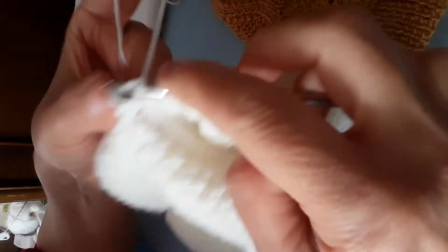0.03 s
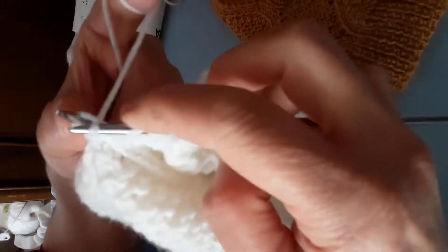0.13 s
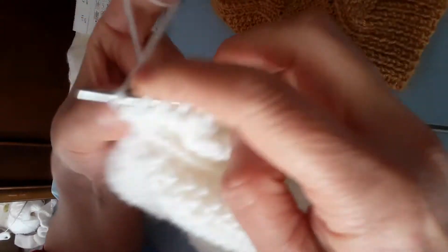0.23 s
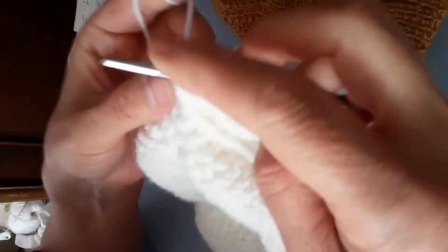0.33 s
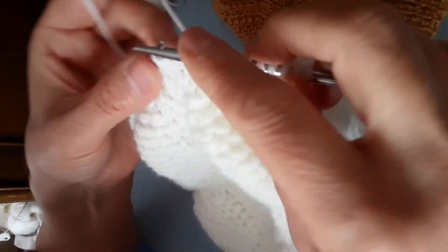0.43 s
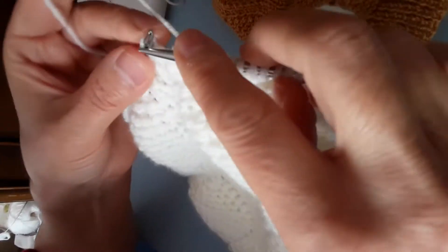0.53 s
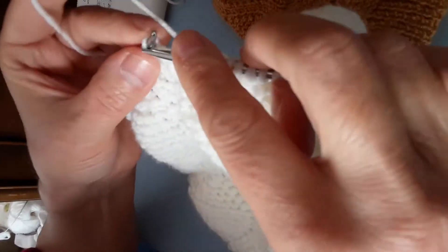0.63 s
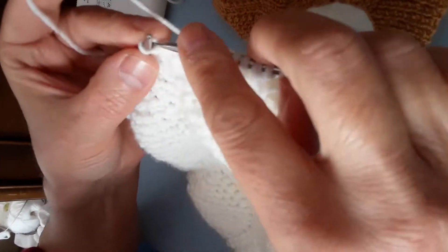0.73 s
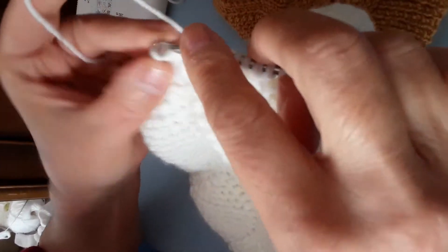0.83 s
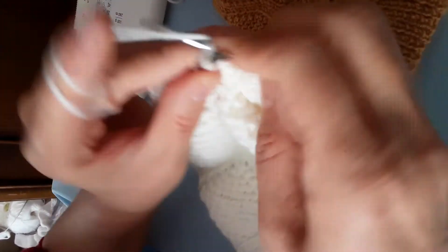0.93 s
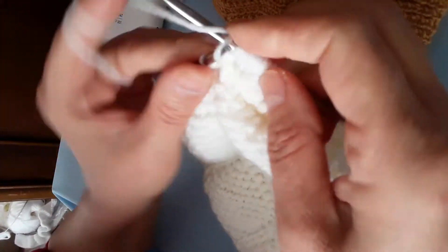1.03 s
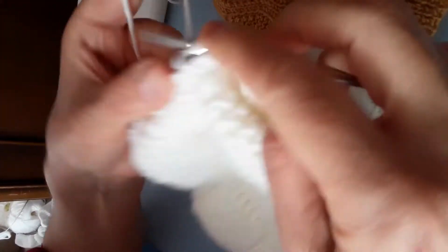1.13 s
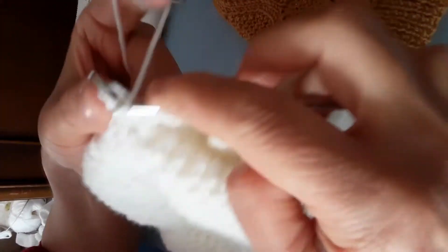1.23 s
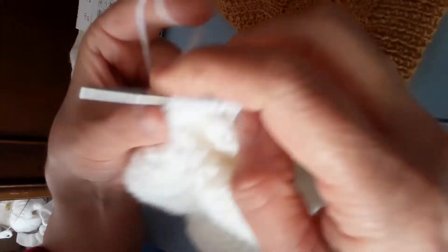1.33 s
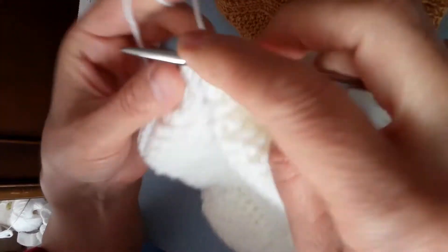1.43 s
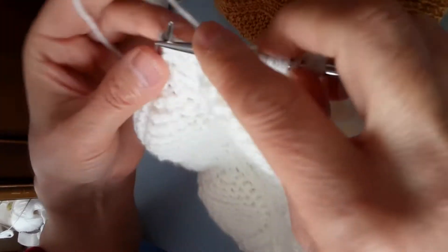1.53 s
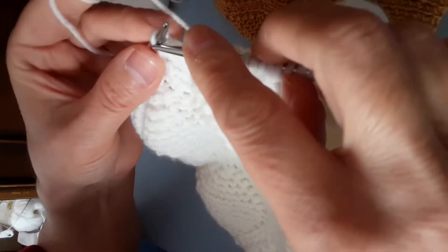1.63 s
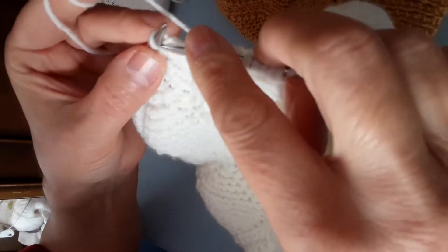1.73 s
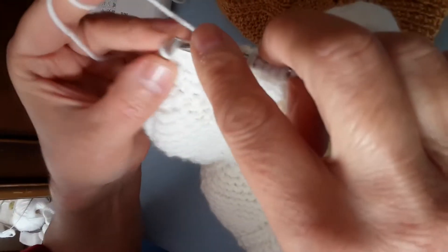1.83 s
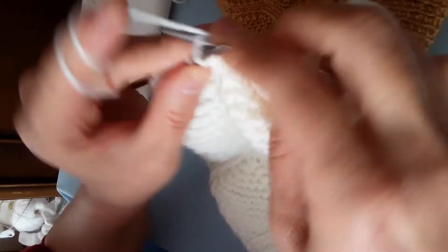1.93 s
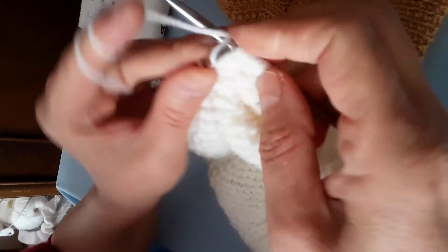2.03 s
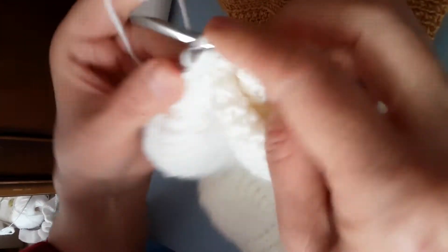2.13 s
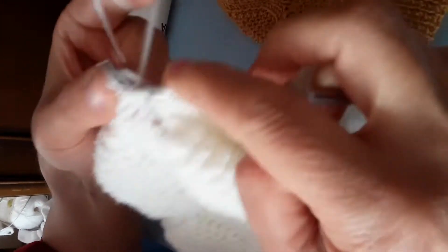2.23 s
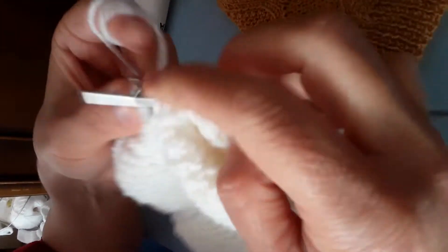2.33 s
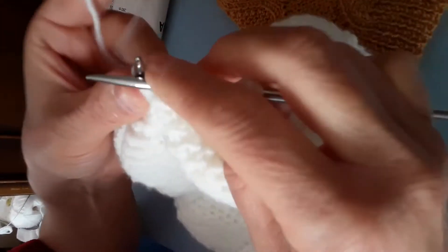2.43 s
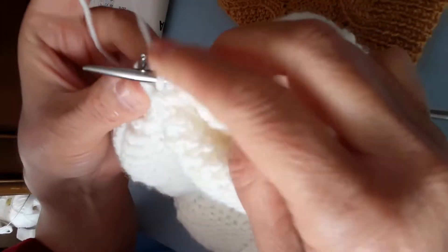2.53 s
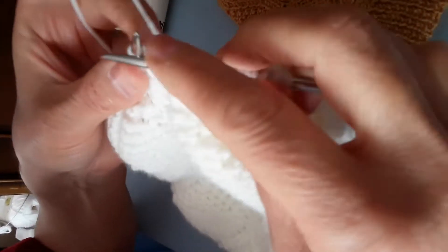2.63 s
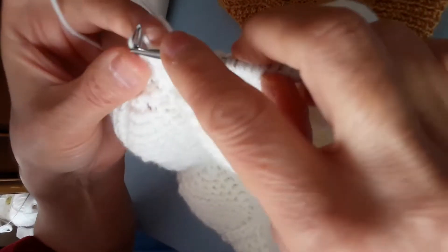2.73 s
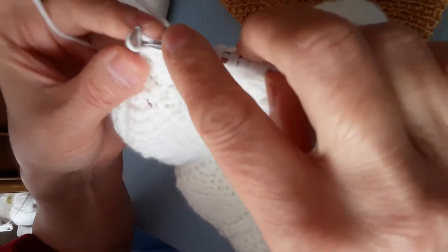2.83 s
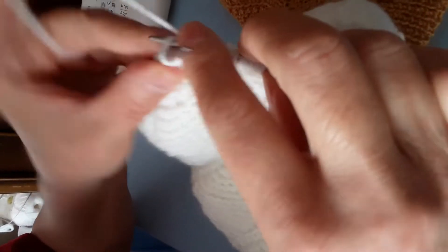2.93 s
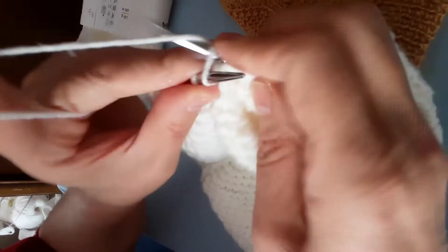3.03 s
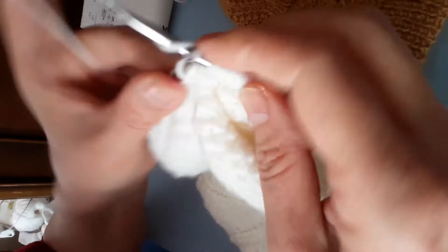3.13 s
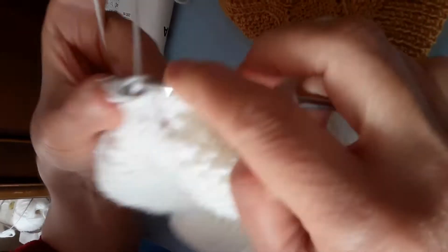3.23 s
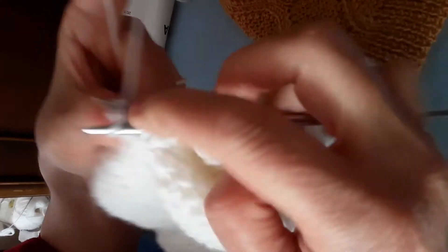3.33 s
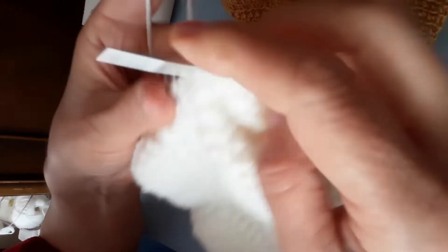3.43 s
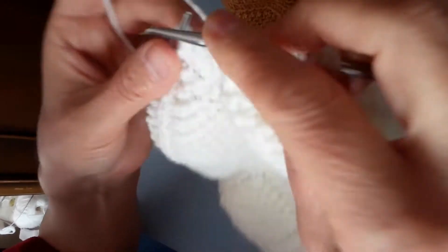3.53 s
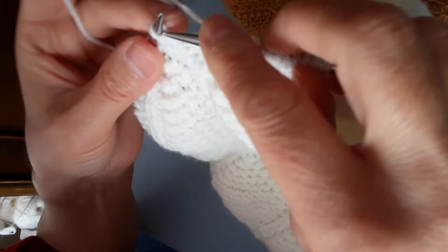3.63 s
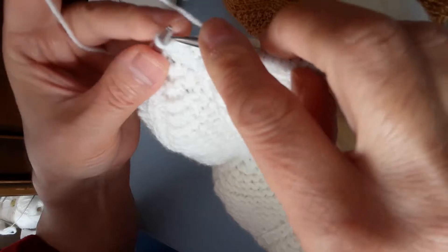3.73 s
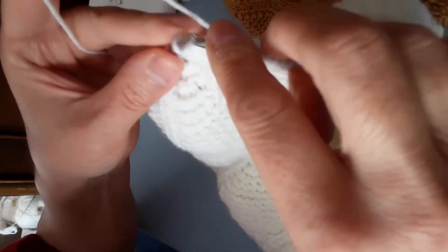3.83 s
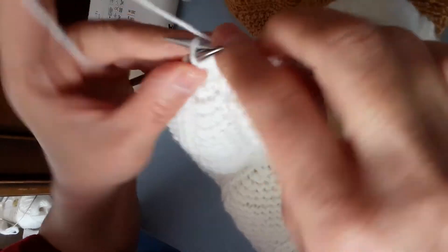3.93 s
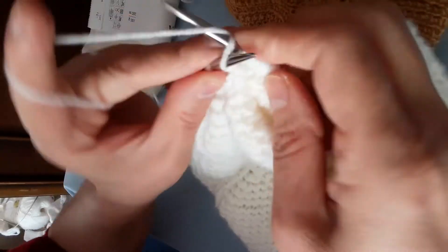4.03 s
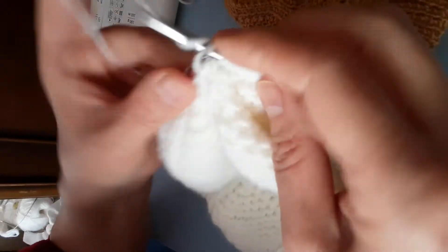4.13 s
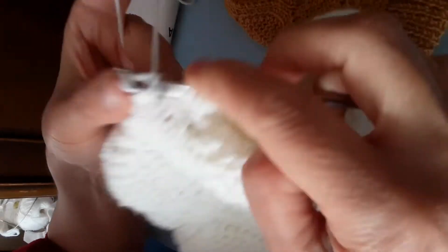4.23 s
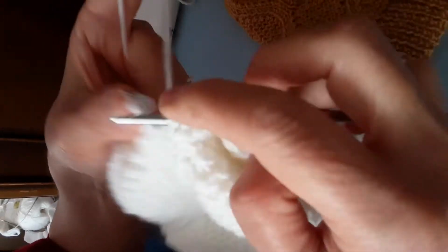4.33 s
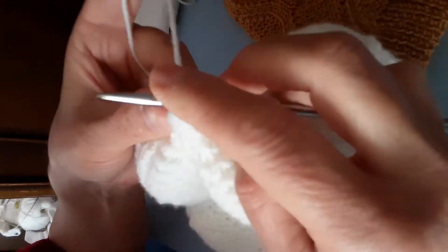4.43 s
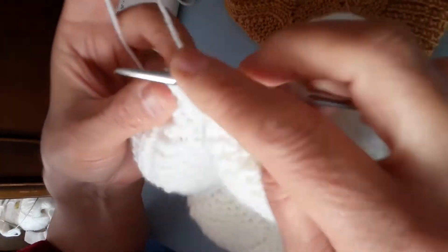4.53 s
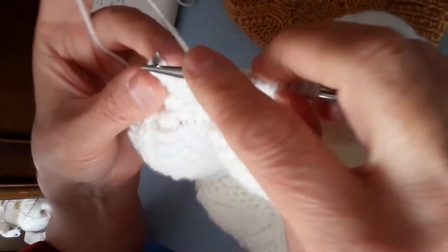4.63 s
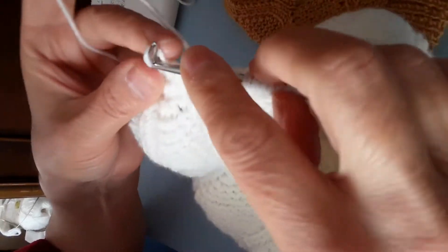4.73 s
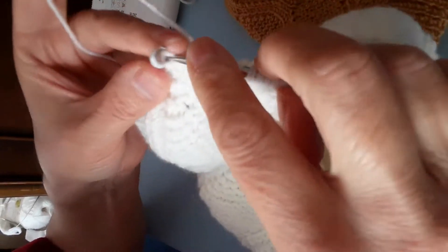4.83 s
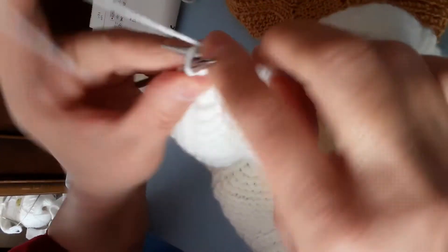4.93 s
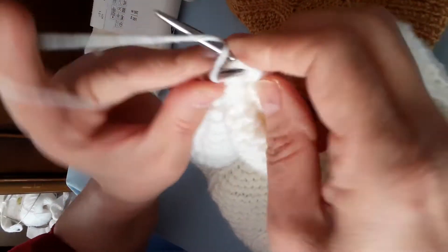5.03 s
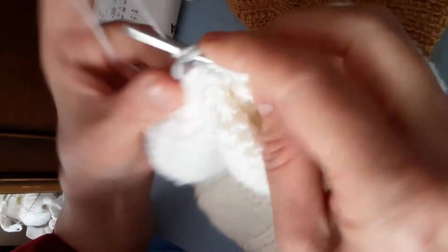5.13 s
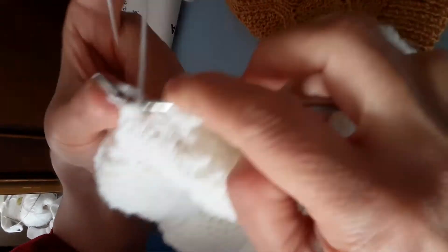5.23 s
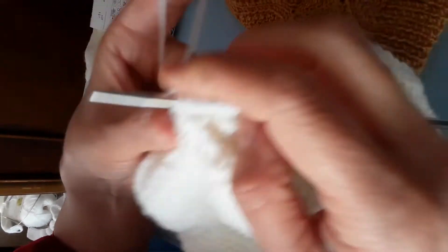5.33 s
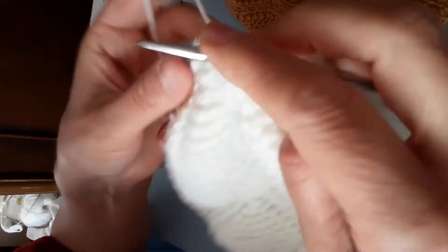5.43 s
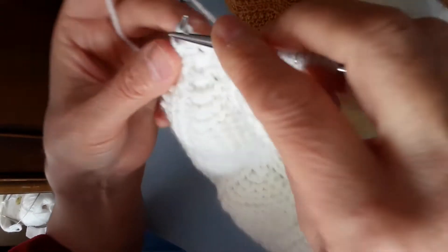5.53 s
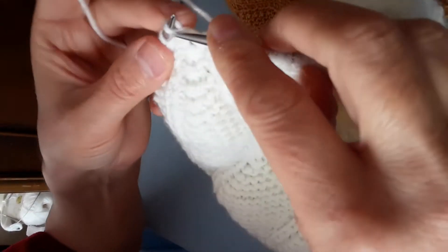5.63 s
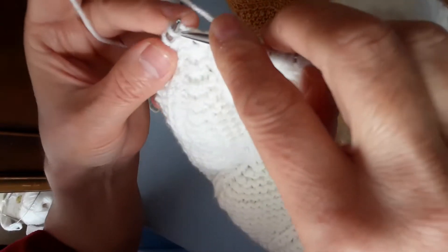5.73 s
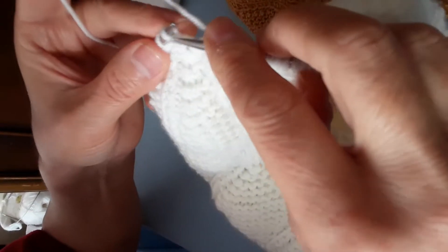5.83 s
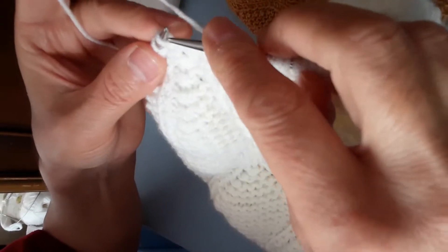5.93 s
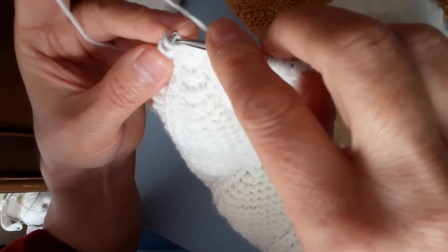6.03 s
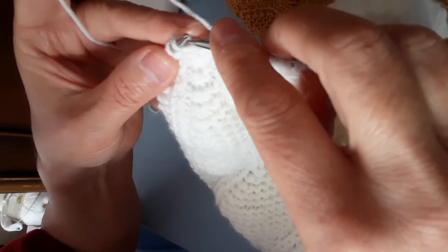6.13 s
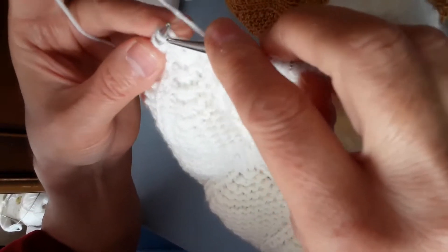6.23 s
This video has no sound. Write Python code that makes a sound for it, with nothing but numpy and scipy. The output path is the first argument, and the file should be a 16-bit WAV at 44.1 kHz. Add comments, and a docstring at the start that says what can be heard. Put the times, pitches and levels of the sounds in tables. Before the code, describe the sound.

Close, crisp clicks of thin metal needles in irregular clusters, soft yarn swishes about once a second, and a single woody knock over faint hum.

```python
"""Metal knitting needles tick and scrape close by; yarn rustles with each stitch in a quiet room.
Under it lie a low hum, thin hiss, one hollow knock further off, fainter knocks, dry taps and soft bumps.
Ticks are short blows filtered by a held needle; slides are gritty noise through the same needle.
Yarn is coloured noise with fibre snaps, shaped by five strokes and a cloth movement per stitch.
Knocks are decaying wood modes plus a thud; bumps are rough low tones; creaks are narrow noise bursts."""
import sys
import numpy as np
from scipy import signal
from scipy.fft import rfft, irfft
from scipy.io import wavfile
from scipy.ndimage import uniform_filter1d

SR = 44100
rng = np.random.default_rng(int(sys.argv[2]) if len(sys.argv) > 2 else 0)


def store_wav(level_fs):
    """Save 16-bit WAV to argv[1]."""
    pcm = np.round(np.clip(np.atleast_2d(level_fs), -1, 1) * 32767)
    wavfile.write(sys.argv[1], SR, pcm.T.astype(np.int16))


N = 277830

# Rumble spectrum. Each row: frequency in Hz, relative level in dB.
HUM_SPECTRUM = [(22, -53), (34, -12), (45, -8.5), (60, 1), (85, 1), (113, -6), (152, 0), (200, -7),
                (300, -8), (420, -19), (700, -21), (1020, -21), (1400, -36), (3300, -85)]
HUM_START_DB, HUM_SINK_DB_PER_S = -61.5, 0.34
# Hiss of the still room. Each row: frequency in Hz, relative level in dB per Hz.
AIR_SPECTRUM = [(710, -30), (1200, -3), (1470, -5), (1910, -3.5), (2080, -5.5), (3380, -8.5), (3810, -9),
                (4520, -9), (5320, -12.5), (5610, -11), (7430, -8.5), (8540, -24), (14800, 3.5),
                (15800, -1)]
AIR_DB = -72.5
# Hiss of opposite sign in the two channels. Each row: frequency in Hz, relative level in dB per Hz.
SIDE_HISS_SPECTRUM = [(24, -38), (40, -29), (91, -1), (261, -7), (1360, -17.5), (3110, -27), (5000, -20),
                      (8670, -37), (11400, -14.5), (15800, -11.5)]
SIDE_HISS_DB = -76
# Decay of the room. Each row: frequency in Hz, t60 in seconds.
ROOM_DECAY = [(200, 0.29), (1000, 0.44), (6000, 0.36), (15000, 0.37)]
# Upper limit of coloured noise and slides; edge of the final low-pass.
TOP_HZ, EDGE_HZ = 15950, 16900

# Soft low bumps. Each row: start in seconds, rms level in dB, frequency in Hz, length in seconds.
BUMPS = [(0.121, -63.5, 87.3, 0.25), (0.48, -66.5, 181, 0.054), (0.611, -56, 75.3, 0.074),
         (0.935, -59, 338, 0.099), (1.45, -71.5, 330.3, 0.22), (2.698, -64, 327, 0.12),
         (3.68, -62.5, 157, 0.19), (3.983, -70, 286.3, 0.21), (4.42, -67, 163.3, 0.39),
         (4.427, -69.5, 278, 0.35), (5.7, -67, 152.8, 0.25)]
# Light dry taps. Each row: start in seconds, initial level in dB, t60 in seconds.
TAPS = [(0.953, -65.5, 0.2), (2.285, -61, 0.015), (2.7, -68, 0.084), (4.2982, -55, 0.016)]
# Colour of the taps. Each row: frequency in Hz, relative level in dB per Hz.
TAP_SPECTRUM = [(300, 3), (900, 4.5), (1900, 5), (2400, -11.5), (3300, -11), (5000, -40)]
# Knocks on wooden furniture. Each row: start in seconds, relative level in dB, dullness in dB per octave.
KNOCKS = [(0.95, -26, 7), (2.039, 1.5, 1), (2.701, -26.5, 9), (4.299, -28, -2)]
# Ring of the furniture. Each row: frequency in Hz, relative level in dB, t60 in seconds.
WOOD_MODES = [(210, -9.5, 0.064), (245, -2, 0.064), (318, -13, 0.32), (385, -16, 0.24), (462, -13.5, 0.17),
              (548.5, -9, 0.18), (653, -22, 0.28), (745, -16, 0.24), (829, -8.5, 0.21), (874, -5.5, 0.13),
              (918, -13, 0.26), (1108, -11.5, 0.19), (1142, -16, 0.18), (1250, -22, .19), (1406, -18, 0.15),
              (1700, -28, 0.2), (2260, -39, 0.13), (3080, -31, .17)]
# Dull body of a blow. Each row: frequency in Hz, relative level in dB per Hz.
THUD_SPECTRUM = [(80, -15), (220, 7.5), (900, -3), (1400, -5.5), (1900, -21), (3200, -22.5), (6000, -22)]

# Taut yarn creaking along a needle.
# Each row: start in seconds, rms level in dB, centre in Hz, width in Hz, length in seconds.
CREAKS = [(0.148, -61, 12200, 2000, .012), (0.153, -51.5, 6480, 810, 0.01), (0.758, -62, 7600, 900, 0.013),
          (0.888, -61.5, 10200, 2800, 0.018), (0.905, -59, 7460, 550, 0.028),
          (0.953, -63, 6400, 1000, 0.024), (1.777, -63, 7400, 1810, 0.025), (2.467, -62, 5380, 300, 0.015),
          (4.907, -67.5, 7600, 700, 0.026)]
# Wool rubbing. Each row: frequency in Hz, relative level in dB per Hz.
WOOL_SPECTRUM = [(2240, -18), (3800, -14.5), (4490, -9), (4940, -4.5), (7110, -2), (7770, 0), (8500, -11.5),
                 (9290, -14), (11400, -4), (14100, -6), (15200, 0), (15800, -9)]
# Stitches, about one a second. Each row: time the loop is drawn through in seconds,
# wrap lead before it in seconds, end of cloth movement after it in seconds,
# then relative levels of probe, wrap, draw, slip and tighten in dB.
STITCHES = [(0.01, 0.2, 0.52, -90, -68, -68, -71, -73), (1.21, 0.25, 0.4, -81, -64, -63, -67, -69),
            (2.22, 0.2, 0.073, -94, -66.5, -66.5, -70.5, -71),
            (3.254, 0.2, 0.42, -74.5, -67.5, -70.5, -67, -70.5),
            (4.236, 0.19, 0.1, -95, -69, -71, -71, -83), (5.215, 0.2, 0.34, -75.5, -67.5, -68, -64, -74.5)]
# Strokes probe, wrap, draw, slip, tighten. Each row: half width in seconds, fine hiss over rub in dB.
STROKES = [(0.15, -1.5), (0.038, 4.5), (0.03, 6), (0.024, 3.5), (0.044, -8.5)]
# Cloth shifting in the fingers: rise in seconds, fall in seconds, relative level in dB, fine hiss over rub in dB.
CLOTH_MOTION = (0.15, 0.04, -69, 2.5)
# The hands never rest completely; levels relative, as in STITCHES.
REST_RUB_DB, REST_HISS_DB = -93, -78
# Timing around each draw.
PROBE_BEFORE_S, SLIP_AFTER_S, TIGHTEN_AFTER_S, CLOTH_LEAD_S = 0.57, 0.17, 0.24, 0.31

# Loosely held needle. Each row: start in seconds, level in dB.
LOOSE_RINGS = [(2.393, -55)]
# Its bending modes. Each row: frequency in Hz, relative level in dB, t60 in seconds.
ROD_MODES = [(3230, -7, .07), (4900, -1, .12), (6400, -1, .12), (8000, -5, .1), (9550, -9, .11),
             (14000, -1, .13)]
# Needle contacts. Each row: time in seconds, low, middle and top treble level in dB,
# contact time in ms, relative level of the slide afterwards in dB.
CONTACTS = [(0.055, -40, -54.5, -33, 1, -11), (0.2702, -48, -46.5, -37, 0.65, -13),
            (0.2854, -47, -55, -49, 1.2, -24), (0.4934, -45, -42, -29, 1.2, -12.5),
            (0.7698, -38, -35.5, -41, 0.13, -21.5), (0.8666, -58, -48.5, -49, 0.45, -13),
            (1.056, -45.5, -44, -53.5, 0.28, -10), (1.2113, -49, -45.5, -60, 0.077, -20),
            (1.25, -50.5, -54, -57, 0.5, -31), (1.5671, -33, -33.5, -27.5, 0.5, -20),
            (1.7906, -43.5, -40, -47, 0.5, -21.5), (1.8384, -62, -53, -62, 0.18, -19),
            (2.2388, -46.5, -43, -36, 0.35, -14), (2.285, -57, -73, -67, 0.6, -14),
            (2.391, -39, -38, -30, 0.42, -15), (2.7396, -47, -39, -34.5, 0.49, -14.5),
            (2.8354, -58, -64, -66, 0.33, -7), (2.9443, -55, -45.5, -47.5, 0.21, -16),
            (3.2632, -37.5, -41.5, -34.5, 0.54, -15), (3.2876, -48, -59, -48, 0.47, -23),
            (3.6301, -45, -42, -26, 0.6, -18), (3.651, -58, -56, -56, 1.2, -18),
            (3.7074, -48, -51, -49, 0.26, -22), (4.108, -46, -46.5, -53, 0.39, -12.5),
            (4.2483, -38.5, -45, -34, 1.3, -13.5), (4.267, -50, -50, -85, 0.63, -24),
            (4.2956, -57, -62, -52, 0.76, -24), (4.3988, -47, -47, -40.5, 0.13, -8),
            (4.4379, -66, -60, -62, 0.3, -7), (4.6643, -48.5, -45, -36, 0.38, -11.5),
            (4.796, -65, -63, -68, 1.7, -13), (4.8138, -60.5, -58.5, -72, 0.4, -20),
            (5.2147, -40.5, -54, -50, 0.078, -8), (5.247, -51.5, -49, -47, 0.27, -24),
            (5.3904, -61, -63, -60, 0.5, -15), (6.0015, -67, -68, -72, 0.45, -15),
            (6.0143, -52, -51.5, -50, 0.21, -15.5), (6.2459, -61, -56, -50, 3.5, -8),
            (6.256, -53, -52, -49, 4.2, -24)]
# Centres of the three treble ranges, in Hz.
TREBLE_HZ = [6300, 10500, 14500]
# Response of a held needle. Each row: frequency in Hz, relative level in dB.
NEEDLE_RESPONSE = [(1000, -57), (2400, -32), (3200, -28), (4100, -24), (4900, -5.5), (5500, -14),
                   (6300, -6), (7550, -2), (9100, -8.5), (12000, -1), (14600, -2), (15600, 2), (16400, -18),
                   (17000, -38)]


def amp(db):
    """Decibels to gain."""
    return 10 ** (np.asarray(db) / 20)


def unit(x):
    """Scales to rms 1."""
    return x / np.sqrt(np.mean(x ** 2) + 1e-30)


def read(points, hz):
    """Interpolates a table on a log-frequency axis."""
    f, value = np.transpose(points)
    return np.interp(np.log(hz + 1), np.log(f), value)


def add(mix, s, sound):
    """Mixes a sound in at s seconds, in place."""
    part = mix[max(round(s * SR), 0):][:len(sound)]
    part += sound[:len(part)]


def noise(size=N):
    """White Gaussian noise."""
    return rng.standard_normal(size)


def colour(x, points):
    """Gives x a spectrum, cut at TOP_HZ; rms 1."""
    hz = np.fft.rfftfreq(len(x), 1 / SR)
    gain = amp(read(points, hz)) * (hz < TOP_HZ)
    return unit(irfft(rfft(x) * gain, len(x)))


def drift(width_hz):
    """Smooth random wandering of rms 1, with a Gaussian spectrum from 0 Hz."""
    hz = np.fft.rfftfreq(N, 1 / SR)
    return unit(irfft(rfft(noise()) * np.exp(-(hz / width_hz) ** 2), N))


def causal(gain):
    """Minimum-phase spectrum: a body rings only after it is struck."""
    both_sides = np.r_[gain, gain[-2:0:-1]]
    log_gain = np.log(np.maximum(both_sides, 1e-6))
    return np.exp(np.conj(signal.hilbert(log_gain)))[:len(gain)]


def modes(table, t):
    """Decaying partials of a struck body, random in phase."""
    out = np.zeros(len(t))
    for hz, db, t60_s in table:
        out += amp(db - 60 * t / t60_s) * np.sin(2 * np.pi * (hz * t + rng.random()))
    return out


def patchy(x, depth_db, frame_count=4, bin_count=6):
    """Uneven friction: brief patches of the spectrum swell and sink; overall level is kept."""
    z = signal.stft(x, nperseg=256)[2]
    patches = uniform_filter1d(noise(z.shape), bin_count, axis=0)
    patches = uniform_filter1d(patches, frame_count, axis=1)
    y = signal.istft(z * amp(depth_db * unit(patches)), nperseg=256)[1][:len(x)]
    return unit(y) * np.std(x)


def background(drone_hz=62, drone_db=-71):
    """Slowly sinking rumble, a wavering narrow-band hum and a thin steady hiss."""
    t = np.arange(N) / SR
    rumble = colour(noise(), HUM_SPECTRUM) * amp(HUM_START_DB - HUM_SINK_DB_PER_S * t)
    phase = 2 * np.pi * drone_hz * t
    drone = unit(drift(9.6) * np.cos(phase) + drift(2.8) * np.sin(phase))
    air = amp(AIR_DB) * colour(noise(), AIR_SPECTRUM)
    return rumble + amp(drone_db) * drone + air


def room(x, delay_s=0.006):
    """Small room: dense reflections, each band dying at its own speed."""
    hz, t, z = signal.stft(noise(SR // 2), SR, nperseg=256)
    decay = amp(-60 * t / read(ROOM_DECAY, hz)[:, None])
    tail = signal.istft(z * decay, SR, nperseg=256)[1]
    tail = np.r_[np.zeros(int(delay_s * SR)), tail]
    return signal.fftconvolve(x, tail / np.linalg.norm(tail))[:N]


def bumps(waver=0.034, rough=0.45):
    """Brief low drones, random in pitch and level, that swell and fade."""
    out, wander, shake = np.zeros(N), drift(40), drift(76)
    for s, db, hz, length_s in BUMPS:
        span = slice(int(s * SR), int((s + length_s) * SR))
        phase = 2 * np.pi * np.cumsum(hz * (1 + waver * wander[span])) / SR
        tone = np.sin(phase) * (1 + rough * shake[span])
        add(out, s, amp(db) * unit(tone * signal.windows.tukey(len(tone), 0.8)))
    return out


def taps(size=8192):
    """Decaying coloured noise with no modal ring."""
    out, t = np.zeros(N), np.arange(size) / SR
    for s, db, t60_s in TAPS:
        add(out, s, colour(noise(size), TAP_SPECTRUM) * amp(db - 60 * t / t60_s))
    return out


def knocks(ring_db=-35, thud_db=-46, thud_t60_s=0.33, pivot_hz=600, size=32768):
    """Blows on furniture: wooden modes and a noise thud, tilted about pivot_hz by each dullness."""
    out, t, hz = np.zeros(N), np.arange(size) / SR, np.fft.rfftfreq(size, 1 / SR)
    octaves = np.log2(np.clip(hz, 200, 2200) / pivot_hz)
    onset = 1 - np.exp(-(t / 0.0003) ** 2)
    for s, db, dull_db in KNOCKS:
        thud = colour(noise(size), THUD_SPECTRUM) * amp(-60 * t / thud_t60_s)
        blow = (amp(ring_db) * modes(WOOD_MODES, t) + amp(thud_db) * thud) * onset
        add(out, s, irfft(rfft(blow) * causal(amp(db - dull_db * octaves))))
    return out


def creaks():
    """Taut yarn sticks and slips: a short noise burst in one narrow band."""
    out = np.zeros(N)
    for s, db, centre_hz, width_hz, length_s in CREAKS:
        n = int(length_s * SR)
        hz = np.fft.rfftfreq(n, 1 / SR)
        band = np.exp(-0.5 * ((hz - centre_hz) / width_hz) ** 2)
        burst = irfft(rfft(noise(n)) * band, n) * signal.windows.tukey(n, 0.7)
        add(out, s, amp(db) * unit(burst))
    return out


def swell(centre_s, half_s):
    """Power of a hand movement that speeds up and slows down."""
    return np.exp(-((np.arange(N) / SR - centre_s) / half_s) ** 2)


def held(start_s, end_s, rise_s, fall_s):
    """Power of a movement that sets in softly, holds and stops."""
    t = np.arange(N) / SR
    rise = (1 + np.tanh((t - start_s) / rise_s)) / 2
    fall = (1 - np.tanh((t - end_s) / fall_s)) / 2
    return rise * fall


def stitching():
    """Rub and hiss gains: powers of probe, wrap, draw, slip, tighten and cloth movement add up."""
    rub, hiss = np.full(N, amp(REST_RUB_DB) ** 2), np.full(N, amp(REST_HISS_DB) ** 2)
    rise_s, fall_s, cloth_db, cloth_hiss_db = CLOTH_MOTION
    for s, wrap_s, cloth_end_s, *levels_db in STITCHES:
        cloth = held(s - CLOTH_LEAD_S, s + cloth_end_s, rise_s, fall_s)
        moves = [(cloth, cloth_db, cloth_hiss_db)]
        offsets_s = [-PROBE_BEFORE_S, -wrap_s, 0, SLIP_AFTER_S, TIGHTEN_AFTER_S]
        for offset_s, db, (half_s, over_db) in zip(offsets_s, levels_db, STROKES):
            moves.append((swell(s + offset_s, half_s), db, over_db))
        for power, db, over_db in moves:
            rub += power * amp(db) ** 2
            hiss += power * amp(db + over_db) ** 2
    return np.sqrt(rub), np.sqrt(hiss)


def yarn(gain_db=-1.5, fibres_per_s=900, fibre_db=-5, spread_db=-1.5, flutter_db=0.04, split_hz=8900):
    """Wool rubs below split_hz and hisses above it while single fibres catch and let go."""
    caught = rng.random(N) < fibres_per_s / SR
    snaps = caught * noise() * amp(spread_db * np.minimum(rng.exponential(1, N), 4))
    wool = colour(noise() + amp(fibre_db) * unit(snaps), WOOL_SPECTRUM)
    rub = signal.sosfiltfilt(signal.butter(6, split_hz, fs=SR, output="sos"), wool)
    rub_gain, hiss_gain = stitching()
    rustle = unit(rub) * rub_gain + unit(wool - rub) * hiss_gain
    return rustle * amp(gain_db + flutter_db * drift(56))


def loose_needle(size=8192):
    """With no finger on it the shaft rings briefly in its bending modes."""
    out = np.zeros(N)
    for s, db in LOOSE_RINGS:
        add(out, s, amp(db) * modes(ROD_MODES, np.arange(size) / SR))
    return out


def ring_gain(levels_db, drive, hz):
    """Where the needles touch decides how strongly each treble range rings."""
    body = amp(read(NEEDLE_RESPONSE, hz))
    nearest = abs(hz[:, None] - TREBLE_HZ).argmin(1)
    energy = np.bincount(nearest, abs(drive * body) ** 2) / len(hz)
    power = energy / (0.005 * SR)  # mean over 5 ms
    return body * amp(np.interp(hz, TREBLE_HZ, levels_db - 10 * np.log10(power)))


def tick(levels_db, contact_ms, impact=1.6, rebound=0.52, rebound_ms=(0.4, 0.728), chatter=0.18,
         chatter_ms=2.2, lead=0.2, lead_ms=0.82, size=2048, band_size=90):
    """A short soft noise rise, then strike, rebound and chatter; the blow lies mid-buffer."""
    ms = (np.arange(size) - size // 2) / SR * 1000
    hz = np.fft.rfftfreq(size, 1 / SR)
    touch, rattle = noise((2, size))
    # one clean impact, then micro-impacts that die away with the contact time
    micro_impacts = touch * (ms > 0) * np.exp(-abs(ms) / max(contact_ms, 0.05))
    blow = impact * (ms == 0) + micro_impacts
    rebound_samples = int(rng.uniform(*rebound_ms) / (ms[1] - ms[0]))
    blow = blow + rebound * np.roll(blow, rebound_samples)
    before = lead * np.exp(-abs(ms) / lead_ms)
    after = chatter * np.exp(-abs(ms) / chatter_ms)
    z = rfft(blow + rattle * np.where(ms < 0, before, after))
    # partly even out the noise burst's spectrum; the needle gives most of the colour
    z = z / uniform_filter1d(abs(z) ** 2, band_size) ** (1 / 3)
    return irfft(z * causal(ring_gain(levels_db, z, hz)))


def slide(levels_db, fade_s=0.037, rise_s=0.0015, evening=0.58, grit_db=3, grit_size=24, size=8192):
    """Shafts scrape grittily along each other, ringing more evenly across the treble than a tick."""
    t, hz = np.arange(size) / SR, np.fft.rfftfreq(size, 1 / SR)
    envelope = np.exp(-t / fade_s) * (1 - np.exp(-t / rise_s))
    even_db = levels_db + evening * (levels_db.mean() - levels_db)
    gain = ring_gain(even_db, 0.91, hz) * (hz < TOP_HZ)
    scrape, grit = noise((2, size))
    grit = np.clip(unit(uniform_filter1d(grit, grit_size)), -2, 2)
    scrape = unit(scrape * amp(grit_db * grit))
    return irfft(rfft(scrape) * gain) * envelope / np.linalg.norm(envelope)


def needles(slide_db=2, grip_db=2.5):
    """Every contact is a tick centred on its time and an uneven slide from it."""
    ticks, slides = np.zeros((2, N))
    for s, *treble_db, contact_ms, after_db in CONTACTS:
        levels_db = np.array(treble_db)
        click = tick(levels_db, contact_ms)
        add(ticks, s - len(click) / 2 / SR, click)
        add(slides, s, amp(after_db + slide_db) * slide(levels_db))
    return ticks + patchy(slides, grip_db)


def scene(room_db=-24, wide_room_db=-38, wool_grip_db=2):
    """Nearly centred; only reflections and hiss differ a little between the sides."""
    knitting = needles() + loose_needle() + patchy(yarn(), wool_grip_db) + creaks()
    direct = knitting + knocks() + taps() + bumps()
    mid = direct + amp(room_db) * room(direct) + background()
    side_hiss = amp(SIDE_HISS_DB) * colour(noise(), SIDE_HISS_SPECTRUM)
    side = amp(wide_room_db) * room(direct) + side_hiss
    return np.array([mid + side, mid - side])


def record(dry):
    """Linear-phase low-pass at EDGE_HZ."""
    lowpass = signal.firwin(511, EDGE_HZ, window=("kaiser", 9), fs=SR)
    return signal.oaconvolve(dry, lowpass[None], "same", axes=1)


dry = scene()
out = record(dry)
store_wav(out)
```